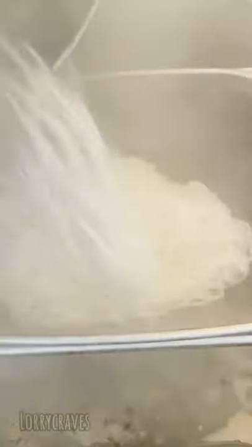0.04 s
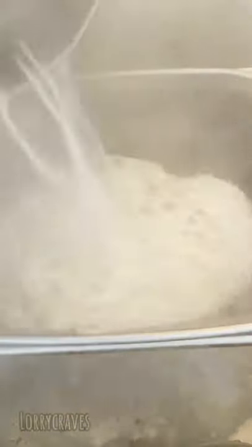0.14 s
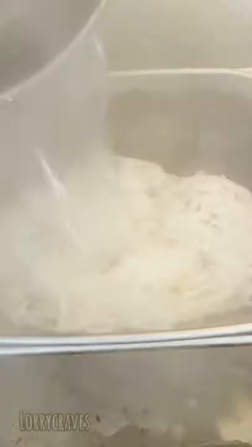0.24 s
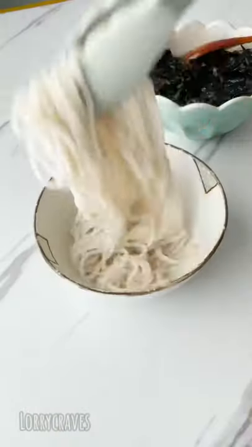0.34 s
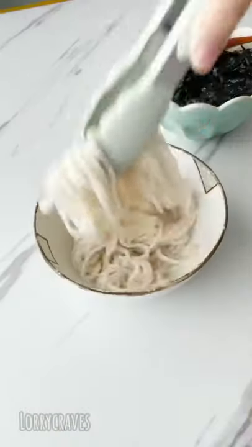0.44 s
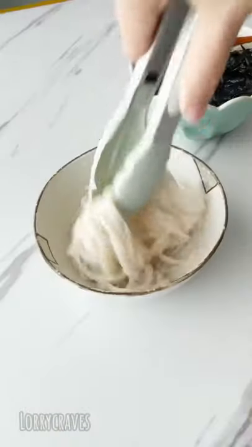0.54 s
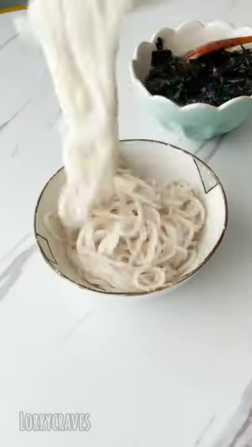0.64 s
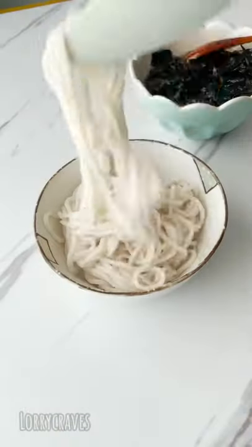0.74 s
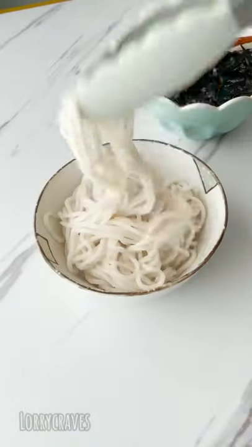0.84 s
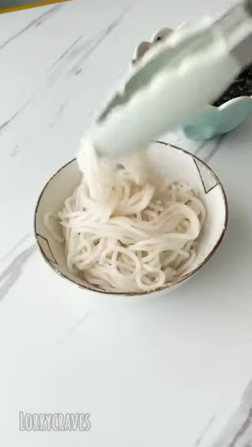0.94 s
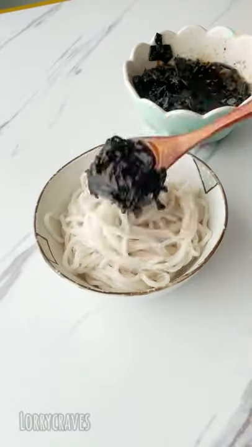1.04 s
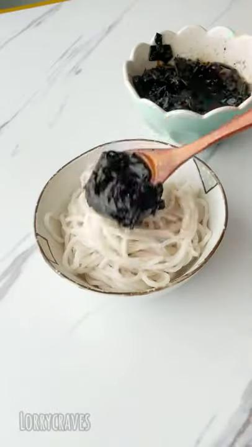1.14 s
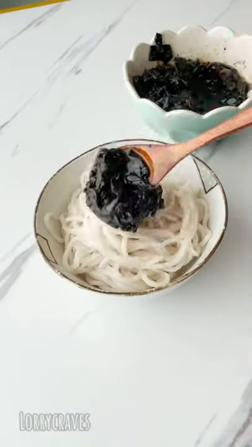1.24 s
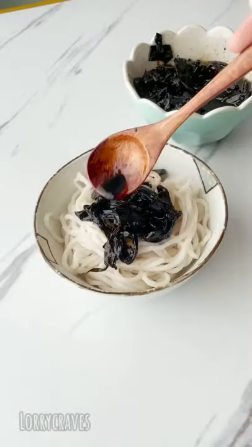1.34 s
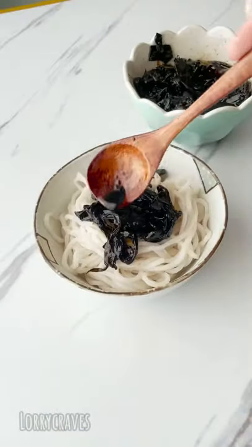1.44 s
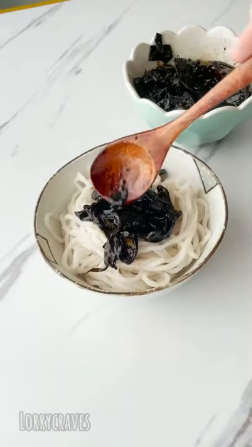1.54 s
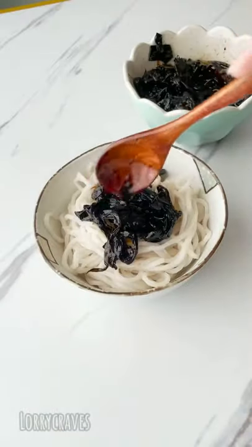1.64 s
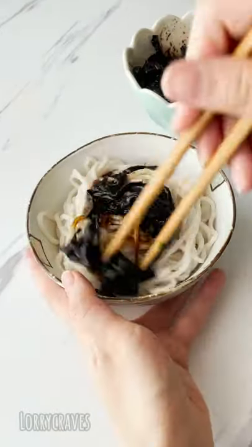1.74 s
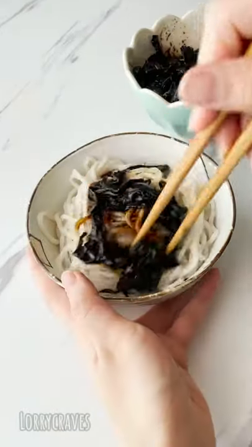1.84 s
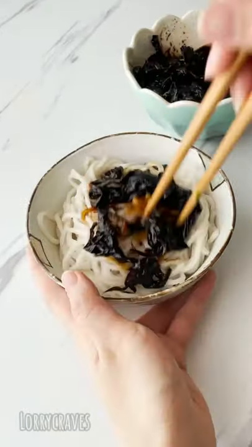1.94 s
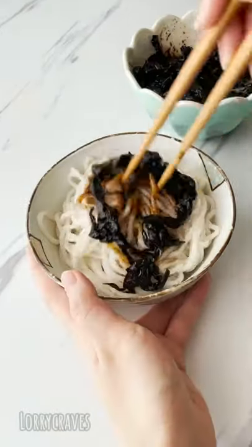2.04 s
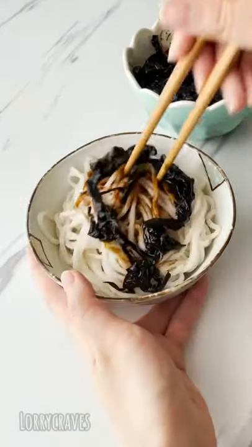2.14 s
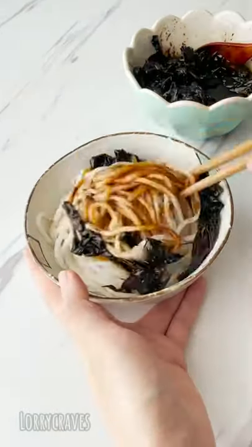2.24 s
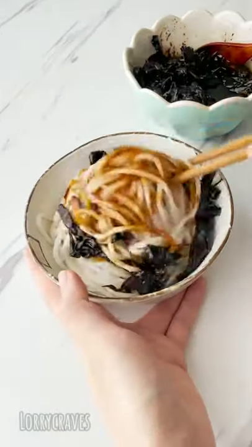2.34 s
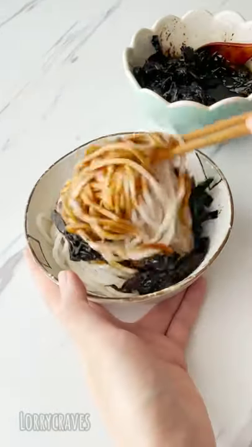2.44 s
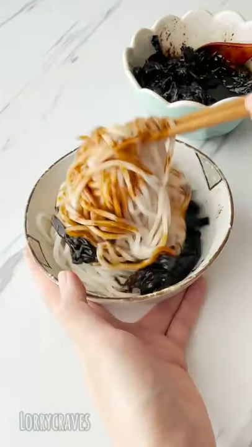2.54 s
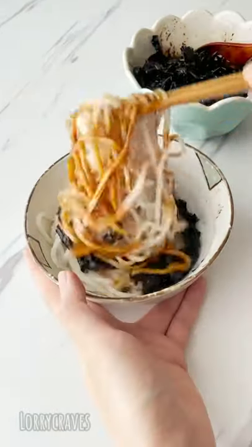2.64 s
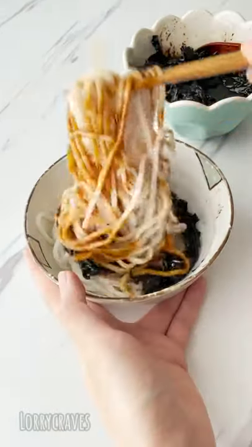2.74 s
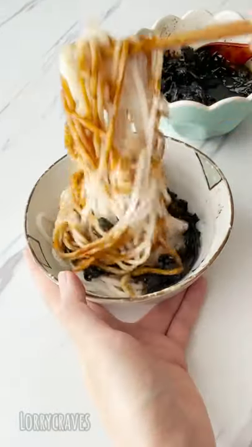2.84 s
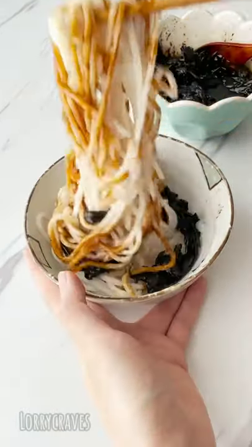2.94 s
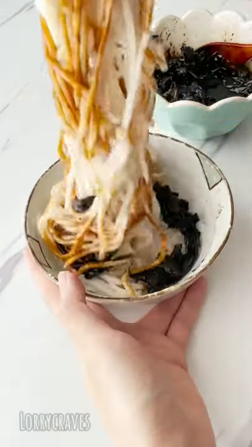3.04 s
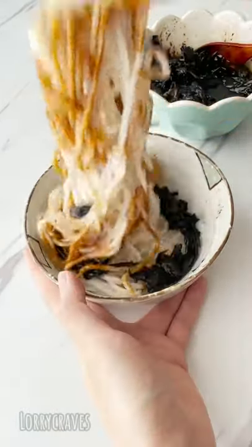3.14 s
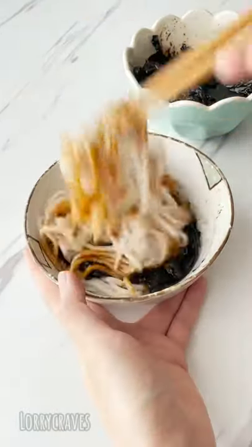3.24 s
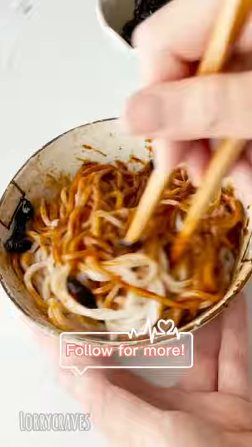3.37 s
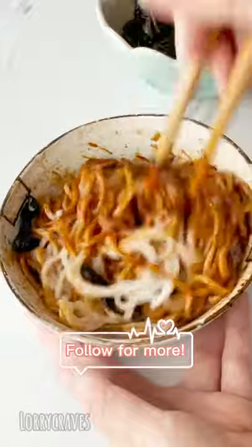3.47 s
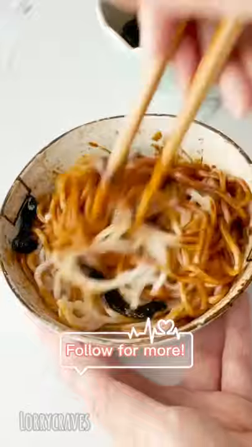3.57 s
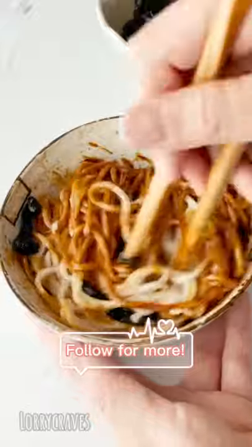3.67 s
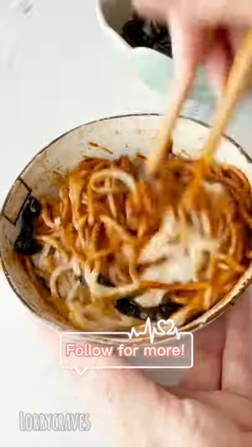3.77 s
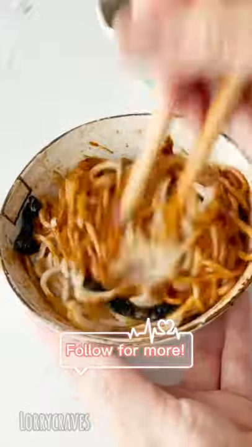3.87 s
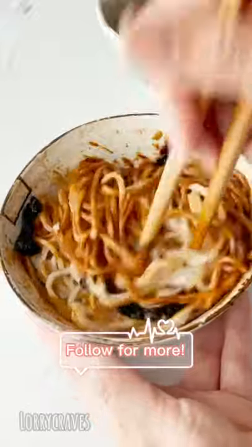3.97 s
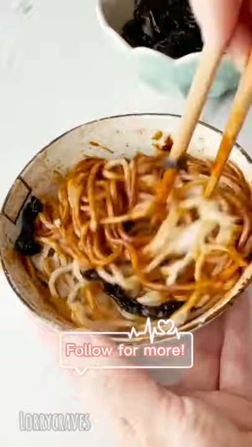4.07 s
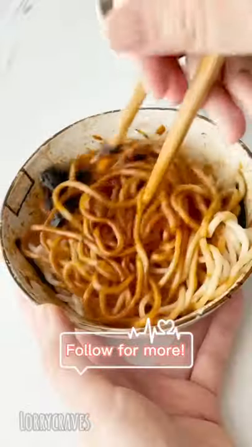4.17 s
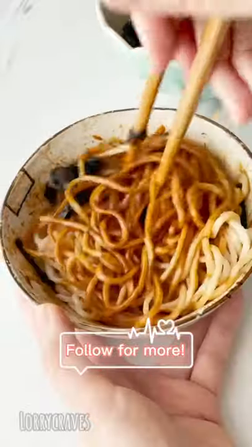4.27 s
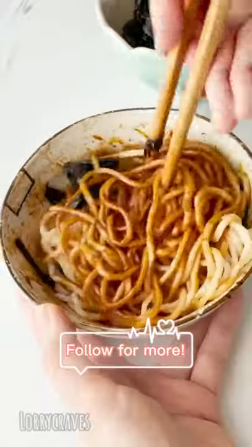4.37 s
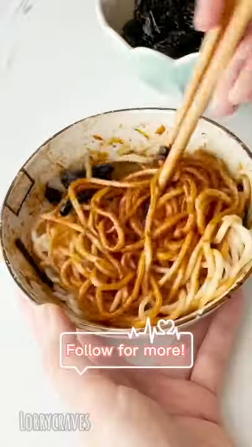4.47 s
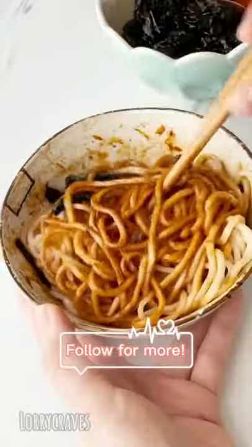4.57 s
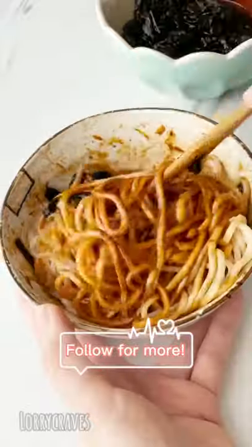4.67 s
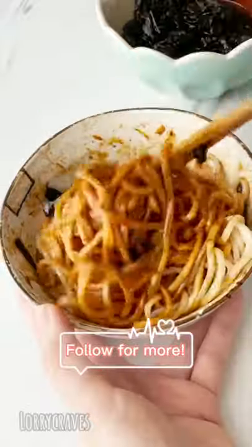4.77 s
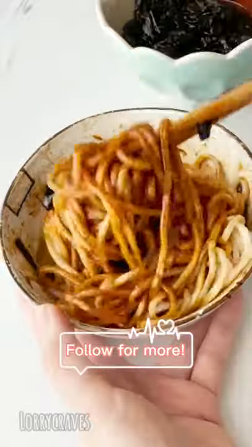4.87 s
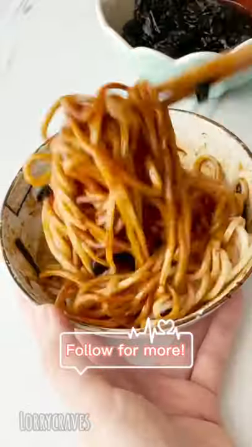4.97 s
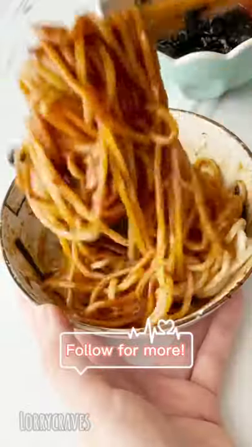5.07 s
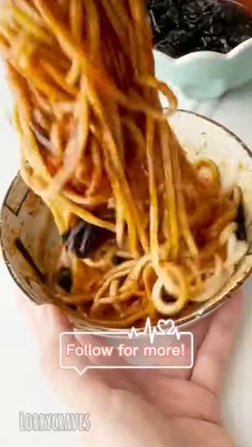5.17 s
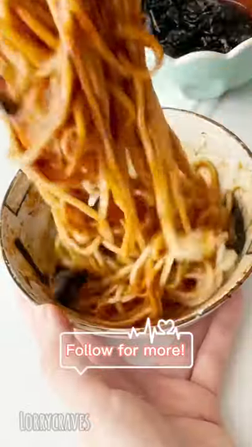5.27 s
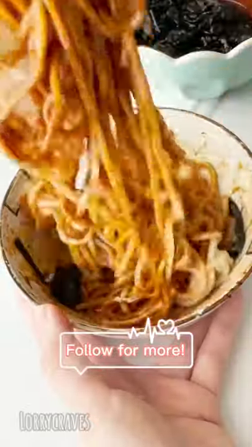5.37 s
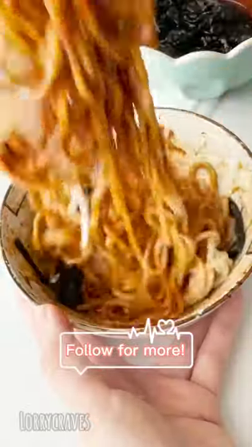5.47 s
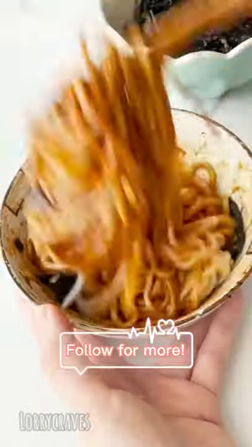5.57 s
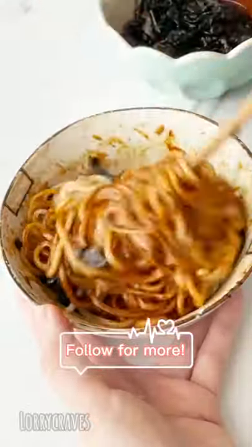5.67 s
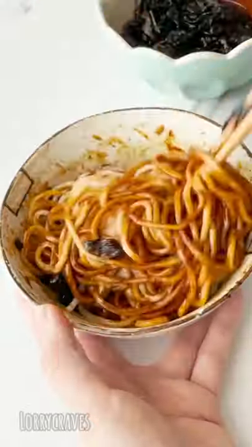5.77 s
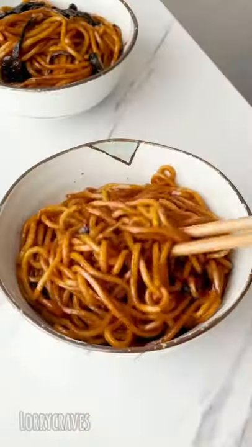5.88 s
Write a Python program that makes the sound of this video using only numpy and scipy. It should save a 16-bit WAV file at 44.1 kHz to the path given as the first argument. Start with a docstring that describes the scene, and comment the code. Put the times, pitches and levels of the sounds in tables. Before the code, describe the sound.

In a small kitchen, a very short gush of water gives way to the soft, wet sound of noodles being served with tongs. Close up, wooden chopsticks start mixing them with sauce, making sticky squishes and tiny snaps that grow busier. Scrapes and clicks on the ceramic bowl mix with hollow knocks against the counter, and a few light clinks come near the end, over a faint wavering hum.

```python
"""At a kitchen counter, water bubbles onto noodles for a moment; then tongs serve them softly into a
ceramic bowl. Wooden chopsticks toss the noodles close to the microphone, and the sauce crackles as its
sticky threads part and its thin films burst. The sticks scrape, squeak and click on the glaze, and the
bowl knocks on the counter. A low hum wavers underneath, with the soft noise of a small room."""
import sys
import numpy as np
from scipy import signal
from scipy.fft import rfft, irfft, next_fast_len
from scipy.io import wavfile
from scipy.ndimage import uniform_filter1d, map_coordinates

SR = 44100
rng = np.random.default_rng(int(sys.argv[2]) if len(sys.argv) > 2 else 0)


def to_wav(sig):
    """Store sig (one row per channel, or 1-D mono) as 16-bit WAV at the path in sys.argv[1].

    Samples outside -1..1 are clipped; the rate is SR.
    """
    pcm = np.clip(np.atleast_2d(sig), -1, 1) * 32767
    pcm = np.round(pcm).astype(np.int16)
    wavfile.write(sys.argv[1], SR, pcm.T)  # frames by channels


N = 260631


def amp(db):
    """Turn decibels into a gain, the number to multiply a sound by."""
    return 10 ** (np.asarray(db) / 20)


def unit(x):
    """Scale a sound to an average strength (rms) of 1."""
    return x / np.sqrt(np.mean(x ** 2) + 1e-20)


def along(points, hz):
    """Read between (frequency, value) points, spaced by octaves."""
    f, v = np.transpose(points)
    return np.interp(np.log(hz + 1), np.log(f + 1), v)


def level(rows):
    """A gain for every sample from (time, level) points, held beyond the ends."""
    return amp(np.interp(np.arange(N) / SR, *np.transpose(rows)))


def faded_level(rows):
    """Like level, but fading quickly to silence beyond the ends."""
    t = np.arange(N) / SR
    inside_s = np.minimum(t - rows[0][0], rows[-1][0] - t)
    return np.clip(inside_s / .008 + 1, 0, 1) * level(rows)


def swell(s, rise_s, fall_s, hold_s=0, sag_db_per_s=0):
    """A gain that rises to 1 at time s, holds or sags, then falls."""
    depth_db, roundness = 31, 1.06  # change over one rise or fall; shape of the top
    t = np.arange(N) / SR - s
    away = np.maximum(-t / rise_s, 0) + np.maximum((t - hold_s) / fall_s, 0)
    return amp(-depth_db * np.minimum(away, 10) ** roundness - sag_db_per_s * np.maximum(t, 0))


def filtered(x, response):
    """Multiply each frequency in a sound by response(hz)."""
    size = next_fast_len(N + SR // 2)
    return irfft(rfft(x, size) * response(np.fft.rfftfreq(size, 1 / SR)), size)[..., :N]


def band(x, pitch_hz, octaves):
    """Keep only the part of a sound near one pitch, at strength 1."""
    return unit(filtered(x, lambda hz: np.exp(-.5 * (np.log2((hz + 1) / pitch_hz) / octaves) ** 2)))


def coloured(x, spectrum):
    """Give a sound a tone colour, at strength 1."""
    size = 4096
    colour_db = np.maximum(along(spectrum, np.fft.rfftfreq(size, 1 / SR)), -100)
    cepstrum = irfft(np.log(amp(colour_db)))
    # folding this in half makes the filter ring after each click, never before it
    cepstrum[1:size // 2] *= 2
    cepstrum[size // 2 + 1:] = 0
    response = irfft(np.exp(rfft(cepstrum)))
    return unit(signal.fftconvolve(x, response)[:N])


def noise(spectrum):
    """Steady noise with this tone colour, at strength 1."""
    return unit(filtered(rng.standard_normal(N), lambda hz: amp(along(spectrum, hz))))


def wobble(per_s):
    """A smooth curve through per_s random values a second."""
    return map_coordinates(rng.standard_normal(int(N * per_s / SR) + 4), [np.arange(N) * per_s / SR])


def grains(per_s, spread_db):
    """Tiny random clicks of uneven size, with even power from moment to moment."""
    clicks = (rng.random(N) < per_s / SR) * rng.choice([-1, 1], N)
    clicks = clicks * amp(spread_db * rng.standard_normal(N))
    power = uniform_filter1d(uniform_filter1d(clicks ** 2, size=3000), size=3000)
    return clicks / np.sqrt(np.abs(power) + 1e-6)


def ring(tones, t, scatter_db):
    """Struck tones, a little different each time; a fade time is how long a 60 dB drop takes."""
    return sum(amp(db + scatter_db * rng.standard_normal() - 60 * t / fade_s)
               * np.sin(2 * np.pi * hz * t) for hz, db, fade_s in tones)


def burst(t, hz, octaves, fade_s):
    """A fading puff of noise near one pitch, with a peak of 1."""
    distance = np.log2((np.fft.rfftfreq(len(t), 1 / SR) + 1) / hz)
    puff = irfft(rfft(rng.standard_normal(len(t))) * np.exp(-.5 * (distance / octaves) ** 2), len(t))
    puff = puff * amp(-60 * t / fade_s) * (1 - np.exp(-2 * t * hz))
    return puff / np.abs(puff).max()


def add(track, s, sound):
    """Mix a sound into the track at time s."""
    part = track[round(s * SR):][:len(sound)]
    part += sound[:len(part)]


# How the hiss rises and falls: t/s, level/dB (in all tables, levels are before the mixing gains)
HISS_LEVEL = [(.2, -79), (.87, -80), (.92, -95), (1.62, -90), (1.78, -72), (3.0, -75.5), (3.12, -64),
              (3.46, -68.5), (3.95, -74), (4.1, -62), (4.33, -56.5), (4.55, -68.5), (5.26, -72), (5.6, -68),
              (5.77, -74.5)]
# Tone colour of the hiss: f/Hz, level/dB
HISS_COLOUR = [(300, -17.5), (500, -4), (1000, -10), (2050, -11.5), (3500, -16), (9000, -26),
               (14000, -48.5)]
def hiss():
    """A soft hiss from all around, different in each ear."""
    return amp(5) * level(HISS_LEVEL) * np.array([noise(HISS_COLOUR), noise(HISS_COLOUR)])


# How the room's low noise rises and falls: t/s, level/dB
ROOM_LEVEL = [(0.23, -64.5), (0.8, -53.5), (1.54, -61.5), (1.65, -49.5), (3.31, -52), (3.5, -41),
              (3.56, -49), (3.89, -50.5), (3.99, -62), (4.02, -49.5), (4.22, -48), (4.26, -35.5),
              (4.43, -49.5), (4.46, -43), (4.63, -54.5), (5.6, -54), (5.66, -49), (5.9, -61)]
# Tone colour of that noise: f/Hz, level/dB
ROOM_COLOUR = [(60, -22), (90, -7), (140, -7), (200, -14.5), (300, -15), (340, -18.5), (400, -27),
               (560, -38), (1000, -47.5), (1800, -69.5)]
def room_noise():
    """The room's low noise, with a narrow whirr that comes and goes."""
    whirr = band(rng.standard_normal(N), 296, octaves=.05) * amp(3 * wobble(3.5))
    return level(ROOM_LEVEL) * (amp(1.5) * noise(ROOM_COLOUR) + amp(-10) * whirr)


# Deep bumps of handling: t/s, level/dB
BUMP_PEAKS = [(.53, -55.5), (1.76, -51), (4.04, -38), (4.27, -43)]
def rumble():
    """A deep rumble that follows the room's noise and swells with each bump."""
    bumps = sum(amp(db) * swell(s, rise_s=.062, fall_s=.3) for s, db in BUMP_PEAKS)
    deep = noise([(10, -24), (22, -1), (38, 7.5), (50, 1), (70, -43.5)])
    return (amp(-13.5) * level(ROOM_LEVEL) + bumps) * deep


# How the hum rises and falls: t/s, level/dB
HUM_LEVEL = [(0.22, -63.5), (0.87, -53.5), (0.95, -69.5), (1.58, -61), (1.86, -37), (2.07, -61),
             (2.16, -40), (2.21, -51), (2.34, -41.5), (2.8, -53), (2.91, -46.5), (3.05, -61), (3.18, -40),
             (3.26, -53.5), (3.53, -36.5), (3.65, -51.5), (3.87, -36.5), (3.97, -54), (4.06, -37.5),
             (4.35, -43.5), (4.49, -37.5), (4.62, -59), (4.81, -35.5), (4.98, -48), (5.15, -37), (5.3, -49),
             (5.47, -40), (5.9, -55.5)]
def hum(pitch_hz=61.4):
    """One low tone that wavers in pitch and loudness."""
    phase = 2 * np.pi * pitch_hz * np.arange(N) / SR + .5 * wobble(27)
    return amp(4) * level(HUM_LEVEL) * np.sin(phase)


# How long the room's echo lasts: f/Hz, fade/s
ECHO_FADE = [(200, 0.22), (1000, 0.34), (4000, 0.2), (14000, 0.091)]
def wall_echo(x):
    """Nearby walls send a sound back as a short wash, different in each ear."""
    hz, t, spectrum = signal.stft(rng.standard_normal((2, SR // 2)), SR, nperseg=256)
    fading = amp(-60 * t / along(ECHO_FADE, hz)[:, None])
    tail = signal.istft(spectrum * fading, SR, nperseg=256)[1]
    delayed = np.pad(x, (200, 0))
    return signal.fftconvolve(delayed[None], tail / np.linalg.norm(tail[0]), axes=1)[:, :N]


# Clicks at the cuts: t/s, level/dB
CUT_CLICKS = [(.897, -54), (1.228, -55), (5.729, -44)]
def cut_clicks():
    """Faint clicks where the sound cuts from one moment to the next."""
    out, t = np.zeros(N), np.arange(SR // 2) / SR
    for s, db in CUT_CLICKS:
        add(out, s, amp(db) * burst(t, 1100, octaves=1.6, fade_s=.0028))
    return out


# Strength of the stream: t/s, level/dB
WATER_FLOW = [(0, -0.5), (.04, 0.5), (.055, 3.5), (.09, -2), (.13, 1), (.16, 0), (.193, -2.5)]
# Tone colour of its rush: f/Hz, level/dB
WATER_COLOUR = [(30, -30), (70, 0.5), (140, 3.5), (260, -2), (520, -18.5), (1050, -8.5), (2200, -9),
                (4600, -15.5), (10000, -14), (13500, -14.5), (15500, -20.5)]
def water(pour_s=.193):
    """Small bubbles ring with rising pitch over a rush, with one sharp splash before it stops."""
    t, bubbles = np.arange(SR // 30) / SR, np.zeros(N)
    for when, pitch, size in rng.random((260, 3)):
        hz = 600 * 12 ** pitch
        chirp = np.sin(2 * np.pi * hz * t * (1 + 12 * t))
        add(bubbles, when * pour_s, size ** 3 * chirp * np.exp(-t * hz / 4))
    gush = faded_level(WATER_FLOW) * amp(wobble(55))
    rush = coloured(rng.standard_normal(N) + grains(2500, 4.2), WATER_COLOUR)
    stream = amp(-32.5) * gush * rush + amp(-38) * bubbles
    add(stream, .174, amp(-20.5) * burst(t, 2200, octaves=.96, fade_s=.019))  # the splash
    add(stream, .1815, amp(-11) * burst(t, 11000, octaves=.5, fade_s=.022))
    return stream * np.clip((pour_s - np.arange(N) / SR) / .0009, 0, 1)


# Strength of the squelch: t/s, level/dB
SQUELCH_LEVEL = [(.235, -80), (.25, -61.5), (.3, -75), (.335, -69), (.42, -84), (.5, -81)]
def tongs():
    """Tongs sink into the noodles with a squelch of tiny clicks."""
    return faded_level(SQUELCH_LEVEL) * band(grains(710, 4.6), 2950, octaves=.32)


# Path of the squeak: t/s, f/Hz, level/dB
SQUEAK_PATH = [(1.634, 2910, -69), (1.68, 2680, -61), (1.74, 2540, -80), (1.801, 2700, -62.5),
               (1.84, 2710, -78), (1.89, 2650, -85)]
def squeak():
    """A stick drags over the glaze with a thin, unsteady tone."""
    s, hz, db = np.transpose(SQUEAK_PATH)
    pitch_hz = np.interp(np.arange(N) / SR, s, hz) * (1 + .0097 * wobble(200))
    return faded_level(np.c_[s, db]) * np.sin(2 * np.pi * np.cumsum(pitch_hz) / SR)


# Light touches on the rim: t/s, level/dB, brightness/dB
RIM_TOUCHES = [(5.212, -47, -2.5), (5.313, -47, -30), (5.525, -53.5, -13)]
# Tones of the rim, lowest first: f/Hz, level/dB, fade/s
RIM_TONES = [(1105, -10.5, 0.23), (2550, 1.5, 0.087), (4400, -7, 0.17)]
def clinks():
    """Touches set the ceramic rim ringing, dull ones mostly its lowest tone."""
    out, t = np.zeros(N), np.arange(SR // 2) / SR
    for s, db, bright_db in RIM_TOUCHES:
        low = ring(RIM_TONES[:1], t, scatter_db=.88)
        high = ring(RIM_TONES[1:], t, scatter_db=.93)
        add(out, s, amp(db) * (low + amp(bright_db) * high))
    return out


# Scrapes, timed at full push: t/s, rise/s, hold/s, fall/s, hollow f/Hz, hollow level/dB, rasp level/dB
SCRAPES = [(0.568, .02, 0.085, 0.28, 323, -54, -91), (1.157, 0.15, 0.046, 0.46, 400, -59.5, -101),
           (3.065, 0.025, 0.19, 0.17, 300, -46, -66), (1.629, 0.0074, 0.0092, 0.21, 925, -46, -49),
           (1.683, 0.037, 0.011, 0.18, 906, -41, -72), (2.013, 0.095, 0.022, 0.1, 810, -51.5, -74),
           (2.092, .015, .035, .08, 830, -53, -57), (3.163, 0.097, 0.14, .1, 2070, -59.5, -76),
           (3.344, 0.073, 0.046, 0.12, 684, -31.5, -38.5), (3.611, 0.012, 0.038, 0.06, 650, -41, -53.5),
           (4.449, .03, 0.041, 0.14, 450, -39, -55), (5.11, 0.035, 0.021, 0.16, 419, -49.5, -76),
           (5.217, .012, 0.0075, 0.05, 400, -36, -61)]
# Tone colour of the hollow part: multiple of its pitch, level/dB
HOLLOW_COLOUR = [(.3, -6), (.65, 3), (1, 9), (1.301, -1), (1.8, -8.5), (3, -34.5)]
# Tone colour of the rasp: f/Hz, level/dB
RASP_COLOUR = [(800, -3.5), (1400, 18.5), (2600, 8), (4000, 0.5), (6500, -3), (10000, -39)]
def scrapes():
    """The sticks and the bowl's foot slide in tiny dry slips: a hollow sound under a rasp."""
    out = np.zeros(N)
    for s, rise_s, hold_s, fall_s, pitch_hz, hollow_db, rasp_db in SCRAPES:
        push = swell(s, rise_s, fall_s, hold_s)
        slips = grains(1800, 4) + .8 * rng.standard_normal(N)
        hollow = push * coloured(slips, [(k * pitch_hz, db) for k, db in HOLLOW_COLOUR])
        rasp = push ** 1.36 * coloured(slips, RASP_COLOUR)  # grows faster with pressure
        out += amp(hollow_db - 4.5) * hollow + amp(rasp_db - 2.5) * rasp
    return out


# Blows on the bowl: t/s, thud level/dB, thud f/Hz, click level/dB, click f/Hz
BOWL_BLOWS = [(0.554, -50, 297, -80, 1500), (1.626, -23, 296, -44, 1960), (2.124, -35, 400, -48, 2000),
              (2.327, -41, 400, -68, 2500), (2.7305, -43, 830, -48.5, 2360),
              (3.0388, -27.5, 600, -30, 3850), (3.079, -24.5, 520, -31, 1550),
              (3.4563, -12.5, 392, -46, 1400), (3.61, -21.5, 580, -27.5, 1960),
              (3.642, -30, 580, -51, 2020), (3.7701, -31.5, 530, -68, 1500),
              (4.029, -37.5, 500, -30.5, 1900), (4.2433, -30.5, 650, -24.5, 2092),
              (4.2508, -3.5, 500, 0, 2006), (4.2802, -8.5, 470, -42, 1500), (4.451, -30, 440, -48, 2040),
              (5.2124, -30, 352, -44, 2610)]
# Tones of the bowl on the counter: f/Hz, level/dB, fade/s
BOWL_TONES = [(332.3, -0.5, .14), (394.2, 1.5, .11), (434, -6, .12), (520, -15.5, 0.033), (595, 0, 0.069),
              (708, -7.5, 0.072), (757, -10.5, 0.13), (843, -13.5, 0.085), (1134, -13, 0.091),
              (1434, -14.5, .04)]
# A harder blow booms lower: thud level/dB, boom f/Hz
BOOM_PITCH = [(-28.5, 295), (-19.5, 271)]
def knocks(thud_lag_s=.00257, boom_fade_s=.48):
    """A stick clicks on the glaze; just after, the bowl thuds on the counter and rings with a low boom."""
    blows, boom, t = np.zeros(N), np.zeros(N), np.arange(SR // 2) / SR
    for s, thud_db, thud_hz, click_db, click_hz in BOWL_BLOWS:
        stick_tones = [(click_hz, 0, .007), (1.233 * click_hz, -4, .005), (3 * click_hz, -8, .004)]
        wood = 1.27 * ring(stick_tones, t, scatter_db=.96) * (1 - np.exp(-t / .00032))
        tick = amp(-9) * burst(t, 8000, octaves=.7, fade_s=.0067)
        buzz = amp(-20) * burst(t, click_hz, octaves=1, fade_s=.05)  # the stick rattles on the glaze
        add(blows, s, amp(click_db - .5) * (wood + tick + buzz))

        punch = 1.6 * np.sin(2 * np.pi * thud_hz * t) * amp(-60 * t / .009)
        bowl = .15 * ring(BOWL_TONES, t, scatter_db=.65)
        puff = .22 * burst(t, 1.03 * thud_hz, octaves=.73, fade_s=.047)
        cushion = 1 - np.exp(-(t / .00094) ** 2)  # a hand softens the landing
        add(blows, s + thud_lag_s, amp(thud_db) * cushion * (punch + bowl + puff))

        boom_hz = np.interp(thud_db, *np.transpose(BOOM_PITCH))
        low_ring = ring([(boom_hz, .77 * thud_db - 21.5, boom_fade_s)], t, scatter_db=.487)
        add(boom, s + thud_lag_s, low_ring * (1 - np.exp(-t / .0044)))
    return blows, boom


# Each pull or turn of the noodles: t/s, hold/s, squish level/dB, fine fizz level/dB
NOODLE_PULLS = [(0.194, 0.33, -61.5, -60.5), (0.625, 0.13, -75, -71), (1.666, 0.34, -60, -57.5),
                (2.063, 0.38, -51.5, -52), (2.5, 0.39, -64.5, -57), (3.036, 0.19, -59, -57.5),
                (3.344, 0.032, -57, -54), (3.566, 0.048, -44.5, -50), (3.834, 0.058, -49.5, -51.5),
                (4.049, 0.0058, -37, -51.5), (4.125, 0.055, -50.5, -54.5), (4.256, 0.23, -40.5, -52.5),
                (4.53, 0.21, -49.5, -51), (4.779, 0.16, -49.5, -54), (4.96, 0.44, -70.5, -55.5),
                (5.536, 0.083, -53, -50), (5.703, .14, -72.5, -64)]
def stirring(settle_span_s=(1.63, 5.88)):
    """How strong the squish and fizz are: each pull starts fast and thins out, over a faint settling."""
    squish = faded_level([(s, -68) for s in settle_span_s])
    fizz = faded_level([(s, -62.5) for s in settle_span_s])
    for s, hold_s, squish_db, fizz_db in NOODLE_PULLS:
        pull = swell(s, rise_s=.043, fall_s=.14, hold_s=hold_s, sag_db_per_s=7)
        squish = np.maximum(squish, amp(squish_db) * pull)
        fizz = np.maximum(fizz, amp(fizz_db) * pull)
    return squish, fizz


# Threads of sauce, thick to thin: f/Hz, width/octaves, level/dB, share that follows the fizz (0 to 1)
SAUCE_THREADS = [(2180, 0.82, -17, 0), (5510, 0.2, -11, 0.14), (7700, 0.18, -9.5, 0.5),
                 (9070, 0.091, -11, 0.03), (11800, .12, -3, 1), (14140, 0.091, -4, 0.9)]
def sauce_crackle(squish, fizz):
    """Countless sticky threads part in little clusters; thinner ones sound higher."""
    clusters, out = unit(amp(3 * wobble(60))), np.zeros(N)
    for pitch_hz, octaves, db, share in SAUCE_THREADS:
        parting = grains(500, 6.3) + .25 * rng.standard_normal(N)
        strength = amp(db) * squish ** (1 - share) * fizz ** share
        out += strength * band(parting, pitch_hz, octaves)
    return amp(-3.5) * clusters * out


def small_snaps(squish, fizz, per_s=20, scatter_db=3.5):
    """Rows like those below for lesser films that burst at random, as strong as the stirring is then."""
    at = np.flatnonzero(rng.random(N) < per_s / SR)
    size_db = scatter_db * np.clip(rng.standard_normal((2, N))[:, at], -2, 2)
    squish_db, fizz_db = 20 * np.log10(np.array([squish[at], fizz[at]]) + 1e-9) + size_db
    return list(zip(at / SR, squish_db - 8, squish_db + 11, fizz_db + 11.5))


# The loudest snaps of sauce: t/s, pop level/dB, smack level/dB, tick level/dB
LOUD_SNAPS = [(0.222, -70, -51, -31), (0.244, -61, -38.5, -37), (0.3288, -40.5, -37, -33),
              (0.429, -64, -58, -34.5), (0.6246, -61, -42.5, -42), (0.6996, -42.5, -35.5, -44),
              (.7383, -70, -55, -40.5), (1.793, -67, -39, -41), (1.8346, -53, -33, -51),
              (1.978, -59, -42, -35), (1.906, -61, -34.5, -32), (2.0224, -72, -46, -31),
              (2.09, -39, -34, -46), (2.1754, -41.5, -40, -37), (2.1966, -65, -28, -27),
              (2.2604, -62, -27, -30), (2.336, -74, -21, -33), (2.393, -67, -33, -31),
              (2.621, -68, -40.5, -36), (2.7315, -42, -29.5, -33), (3.0245, -37, -41, -42),
              (3.0795, -28, -52, -37), (3.2307, -52, -46, -30), (3.355, -29, -31.5, -25.5),
              (3.3733, -32, -42, -25), (3.4946, -65, -60, -26), (3.6085, -28.5, -43, -46),
              (3.747, -62, -33.5, -32), (3.827, -45.5, -33, -31), (4.0388, -31, -20, -26),
              (4.0677, -23, -23.5, -27.5), (4.1748, -37.5, -26, -29.5), (4.341, -33, -25, -27.5),
              (4.3671, -29.5, -24.5, -27), (4.414, -35, -18, -38), (4.5935, -70, -33, -32.5),
              (4.6744, -46, -29.5, -34), (4.7703, -58, -31.5, -33), (4.8188, -64, -28, -33.5),
              (4.842, -42, -27, -23.5), (4.909, -69, -52, -28), (5.0325, -67, -54, -28),
              (5.4396, -71, -44, -25.5)]
def sauce_snaps(squish, fizz):
    """Films of sauce burst, each with its own mix of a lower pop, a bright smack and a very high tick."""
    out, t = np.zeros(N), np.arange(SR // 20) / SR
    for s, pop_db, smack_db, tick_db in LOUD_SNAPS + small_snaps(squish, fizz):
        pop = amp(pop_db - 5) * burst(t, 2900, octaves=.42, fade_s=.008)
        smack = amp(smack_db - 4.5) * burst(t, 7750, octaves=.32, fade_s=.012)
        tick = amp(tick_db - 1.5) * burst(t, 12930, octaves=.2, fade_s=.0087)
        add(out, s, pop + smack + tick)
    return out


def bowl_echo(x, fade_s=.0028):
    """The bowl's sides scatter a sound differently to the left and right."""
    t = np.arange(SR // 200) / SR
    scatter = rng.standard_normal((2, len(t))) * amp(-60 * t / fade_s)
    return signal.fftconvolve(x[None], scatter / np.linalg.norm(scatter[0]), axes=1)[:, :N]


# How far the left side's wave runs ahead of the right: f/Hz, lead/radians
LEFT_LEAD = [(0, 0), (1200, .05), (4200, .5), (5300, .1), (6000, .5), (8000, 2.05), (9200, 3),
             (11000, 3.35), (13000, 4.9), (15000, 6.2)]
def microphone(x):
    """Sound enters two close openings, left and right, which fall out of step on high notes."""
    return filtered(x, lambda hz: np.exp(.5j * along(LEFT_LEAD, hz) * np.array([[1], [-1]])))


def scene():
    """Mix the direct sound with short echoes from the bowl and the walls."""
    blows, boom = knocks()
    background = hum() + rumble() + hiss()
    room = room_noise()
    pour = water()
    bowl = blows + scrapes() + clinks()
    cuts = cut_clicks()
    bowl += squeak()
    squish, fizz = stirring()
    noodles = sauce_crackle(squish, fizz) + tongs() + sauce_snaps(squish, fizz)
    direct = microphone(background + room + cuts + pour + bowl + boom + noodles)
    walls = wall_echo(amp(-11) * (noodles + bowl + cuts) + amp(-8) * room)
    return direct + amp(-10) * bowl_echo(noodles) + walls


def record(dry, ceiling=.95, top_hz=16000):
    """The recorder softly rounds off the tallest peaks and cuts the very highest treble."""
    rounded = dry / (1 + np.abs(dry / ceiling) ** 8) ** (1 / 8)
    return filtered(rounded, lambda hz: 1 / (1 + (hz / top_hz) ** 160))


dry = scene()
out = record(dry)
to_wav(out)
```